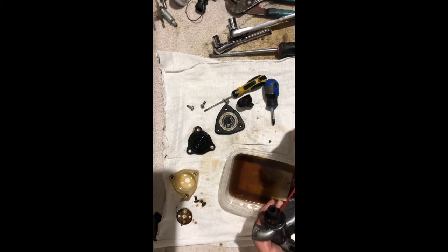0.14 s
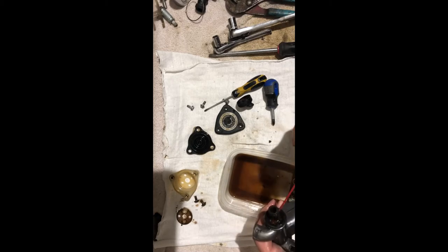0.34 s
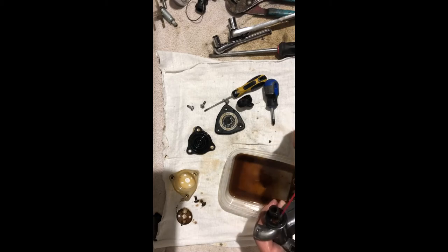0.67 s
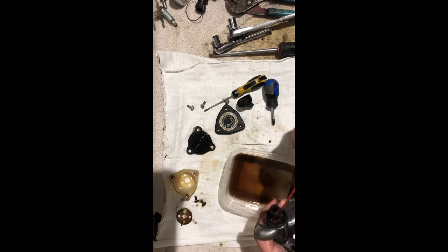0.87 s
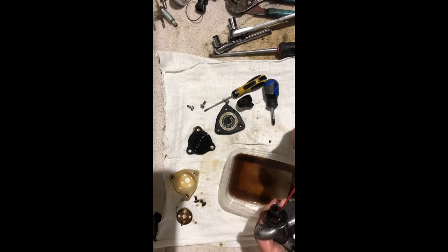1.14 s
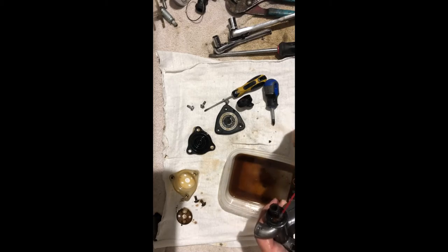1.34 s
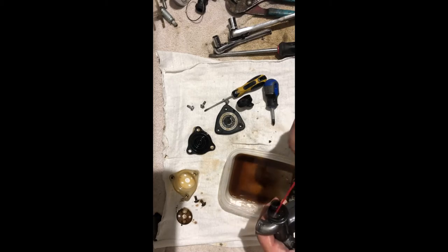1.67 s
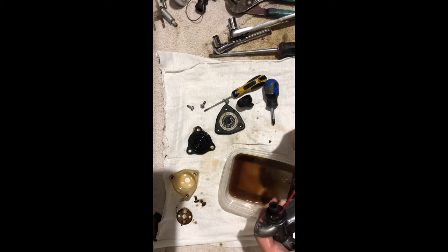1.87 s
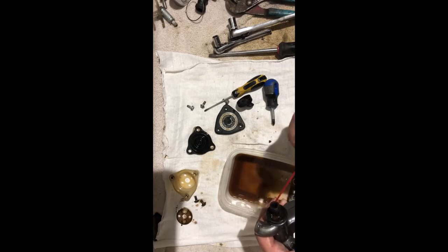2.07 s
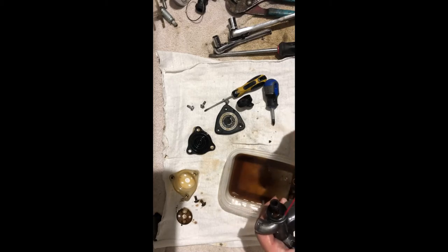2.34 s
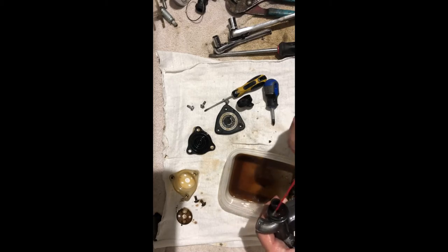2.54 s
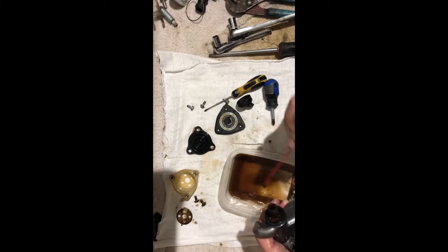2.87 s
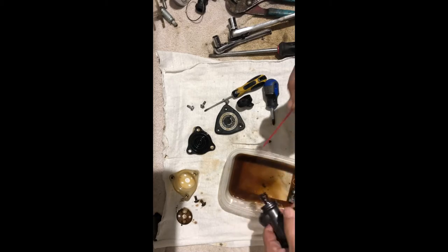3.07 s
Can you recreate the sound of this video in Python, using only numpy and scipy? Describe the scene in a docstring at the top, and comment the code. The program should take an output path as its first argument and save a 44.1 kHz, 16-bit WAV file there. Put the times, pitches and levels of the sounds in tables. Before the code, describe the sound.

An aerosol can sprays into a metal part after a tiny tick, hissing for over two and a half seconds with shifting resonances, then squeaks shut and dribbles; close microphone, quiet humming workshop.

```python
"""A hissing, spitting spray rings a thin straw and a metal bore, over a low workshop hum.
An aerosol can sprays cleaner into the part: turbulent noise through resonances that fade from pose to pose
as the hand moves the aim. The closing valve squeaks in a few harmonics, the straw whistles in gliding
sines and dribbles out. Ticks are short chirps, the room is shaped noise, the walls are sparse echoes."""
import sys
import numpy as np
from scipy import signal
from scipy.fft import rfft, irfft
from scipy.io import wavfile
from scipy.ndimage import uniform_filter1d, map_coordinates

SR = 44100
rng = np.random.default_rng(int(sys.argv[2]) if len(sys.argv) > 2 else 0)


def voltage_ratio(decibels):
    """Convert decibels (scalar or array-like) to amplitude ratios, 20 dB per decade."""
    exponent = np.asarray(decibels, float) / 20
    return 10 ** exponent


def generate_wav(signal):
    """Clip the signal to [-1, 1] and save it as 16-bit WAV at the path in sys.argv[1]."""
    frames = np.transpose(np.atleast_2d(signal))
    scaled = np.clip(frames, -1, 1) * 32767
    pcm = np.round(scaled).astype(np.int16)
    wavfile.write(sys.argv[1], SR, pcm)


N = 141120  # samples, 3.2 s

# Crossovers between lows, body, treble and top treble, and the upper end of the spray's band, in Hz
LOW_HZ, TREBLE_HZ, TOP_HZ, EDGE_HZ = 2800, 9200, 13000, 15770


def evened(x):
    """Scales to rms 1."""
    return x / np.sqrt(np.mean(x ** 2) + 1e-20)


def read(points, hz):
    """Reads a spectrum table on a log frequency axis."""
    point_hz, value = np.transpose(points)
    return np.interp(np.log(hz + 1), np.log(point_hz + 1), value)


def along(table, column=1):
    """Interpolates one column of a time table, sample by sample."""
    rows = np.array(table)
    return np.interp(np.arange(N) / SR, rows[:, 0], rows[:, column])


def wander(seconds):
    """Smooth random drift of rms 1: noise averaged over the given time."""
    return evened(uniform_filter1d(rng.standard_normal(N), max(int(seconds * SR), 2)))


def room_tone():
    """Low workshop rumble of shaped noise, with hum lines made fuzzy by a narrow band of noise each."""
    # Colour of the rumble. Each row: frequency in Hz, relative density in dB per Hz.
    rumble_colour = [(18, -48), (30, -13.5), (66, -4), (156, -5), (188, -9.5), (238, -14), (278, -15),
                     (423, -17.5), (626, -22.5), (714, -21), (1000, -23.5), (1370, -29), (1740, -31.5),
                     (4830, -35.5), (15700, -40)]
    # Wavering low hum. Each row: frequency in Hz, width in Hz between the -6 dB points, rms level in dB.
    hum_lines = [(59.4, 13, -73.5), (83.3, 2.6, -72.5), (142.3, 9.9, -75.5)]
    rumble_db = -67.5
    hz = np.fft.rfftfreq(N, 1 / SR)
    rumble = irfft(rfft(rng.standard_normal(N)) * voltage_ratio(read(rumble_colour, hz)), N)
    out = voltage_ratio(rumble_db) * evened(rumble)
    for centre, spread_hz, db in hum_lines:
        line = 1 / (1 + (2 * (hz - centre) / spread_hz) ** 2)
        out = out + voltage_ratio(db) * evened(irfft(rfft(rng.standard_normal(N)) * line, N))
    return out


def walls(x):
    """Sparse echoes from bench and walls, of random sign and spacing, decaying exponentially."""
    t60_s = .2
    taps = np.zeros(SR // 2)
    at = np.arange(60, SR // 2 - 22, 22)
    at = at + rng.integers(0, 22, len(at))  # one echo somewhere in every 22 samples
    taps[at] = rng.choice([-1., 1.], len(at)) * voltage_ratio(-60 * at / SR / t60_s)
    return signal.fftconvolve(x, taps / np.linalg.norm(taps))[:N]


def ticks():
    """Small ticks of the nozzle: windowed sines, each a few milliseconds long."""
    # Each row: start in seconds, start pitch in Hz, end pitch in Hz, length in seconds, peak level in dB.
    tick_rows = [(0.172, 2800, 14000, .005, -64), (2.982, 13000, 13000, .003, -74)]
    out = np.zeros(N)
    for start, start_hz, end_hz, length, db in tick_rows:
        n = int(length * SR)
        at = round(start * SR)
        cycles = np.cumsum(np.geomspace(start_hz, end_hz, n)) / SR
        out[at:at + n] += voltage_ratio(db) * np.hanning(n) * np.sin(2 * np.pi * cycles)
    return out


def straw_whistles(wobble):
    """The straw whistles as the flow thins: sines that glide just before their peak."""
    # Each row: start, peak and end in seconds, start pitch in Hz, end pitch in Hz, rms level at the peak in dB.
    whistle_rows = [(2.852, 2.875, 2.888, 2970, 3060, -46), (2.84, 2.871, 2.89, 4520, 5040, -49),
                    (2.865, 2.878, 2.885, 15200, 15300, -62), (2.93, 2.95, 3.01, 3000, 3020, -76),
                    (3.145, 3.19, 3.21, 3980, 4020, -83)]
    t, out = np.arange(N) / SR, np.zeros(N)
    for start, peak, end, start_hz, end_hz, db in whistle_rows:
        swell = np.sin(np.pi / 2 * np.interp(t, [start, peak, end], [0, 1, 0])) ** .5
        hz = np.interp(t, [(start + peak) / 2, peak], [start_hz, end_hz])
        out = out + voltage_ratio(db) * swell * np.sin(2 * np.pi * np.cumsum(hz * wobble) / SR)
    return np.sqrt(2) * out


def valve_squeak(wobble):
    """The closing valve squeaks: three harmonics on a short pitch arch, brightening as it falls."""
    # Each row: time in seconds, pitch in Hz, rms level of the fundamental in dB,
    # brightness in dB per step up the harmonics.
    arch = [(2.856, 1750, -74, -4), (2.862, 1800, -65, -4), (2.869, 1990, -58, -2), (2.884, 2000, -58, 1),
            (2.892, 1830, -62, 3), (2.898, 1650, -67, 7), (2.903, 1420, -77, 8), (2.907, 1380, -90, 8)]
    t = np.arange(N) / SR
    turns = np.cumsum(along(arch) * wobble) / SR
    brightness_db = along(arch, column=3)
    tone = np.zeros(N)
    for order in (1, 2, 3):
        harmonic = np.sin(2 * np.pi * (order * turns + rng.random()))
        tone = tone + voltage_ratio((order - 1) * brightness_db) * harmonic
    sounding = (t > arch[0][0]) * (t < arch[-1][0])
    return np.sqrt(2) * tone * voltage_ratio(along(arch, column=2)) * sounding


def turbulence():
    """Fluttering gas noise with short spits of liquid: random noise bursts that die off exponentially."""
    spits_per_s, spit_spread_db, spit_db, spit_s = 900, 4, -10.5, 0.00028  # spit_db is relative to the gas
    flutter_db, flutter_s, surge_db, surge_s = 0.96, 0.0026, 0.25, 0.029  # rms depths, averaging times
    struck = rng.random(N) < spits_per_s / SR
    size = struck * voltage_ratio(spit_spread_db * np.minimum(rng.exponential(1, N), 4))
    burst = signal.lfilter([1], [1, -np.exp(-1 / (spit_s * SR))], size)
    spits = evened(burst * rng.standard_normal(N))
    gas = evened(rng.standard_normal(N) * voltage_ratio(flutter_db * wander(flutter_s)))
    return (gas + voltage_ratio(spit_db) * spits) * voltage_ratio(surge_db * wander(surge_s))


def patchy(x):
    """Lays slowly changing ridges and gliding hollows over the spectrum."""
    # Hollows that open, and some glide, as the part turns. Each row: start and end in seconds,
    # start and end frequency in Hz, half width in Hz, depth in dB.
    hollow_rows = [(1.98, 2.25, 13500, 11400, 830, -3), (2.1, 2.5, 13700, 10200, 610, -2),
                   (1.5, 1.75, 12500, 9800, 670, -2), (1.46, 1.88, 6300, 6050, 350, -3),
                   (2.35, 2.7, 5900, 6100, 350, -4), (1.43, 1.82, 8400, 8200, 580, -4),
                   (2.36, 2.68, 8000, 7900, 500, -2)]
    ridge_db, ridge_hz, ridge_s = 2.0, 450, .06  # rms in the treble; scales of the smoothing
    hz, t, z = signal.stft(x, SR, nperseg=512, noverlap=384)
    field = rng.standard_normal(z.shape)
    for _ in range(2):
        field = uniform_filter1d(field, int(ridge_hz / hz[1] / 2) + 1, 0)
        field = uniform_filter1d(field, int(ridge_s * SR / 128), 1)
    deeper_upwards = np.clip(hz / TREBLE_HZ, 0, 1)[:, None] ** 2
    db = ridge_db * deeper_upwards * evened(field)
    for start, end, start_hz, end_hz, half_hz, depth_db in hollow_rows:
        progress = np.clip((t - start) / (end - start), 0, 1)
        centre = start_hz + progress * (end_hz - start_hz)
        dip = np.exp(-((hz[:, None] - centre) / half_hz) ** 2)
        db = db + depth_db * np.sin(np.pi * progress) ** .5 * dip
    return signal.istft(z * voltage_ratio(db), SR, nperseg=512, noverlap=384)[1][:N]


def pose_powers(hz):
    """Power spectrum of each pose: broad hiss plus resonant peaks of straw and bore, dented by gaps."""
    # Resonances of straw and bore, one table a pose. Each row: pitch in Hz,
    # least width in Hz between the -6 dB points, relative peak level in dB.
    ring_first = [(870, 110, -18), (1745, 42, -2), (2570, 130, -18), (3240, 78, -2), (4280, 280, 3),
                  (5260, 160, 3), (5540, 110, -2), (6400, 39, -3), (6770, 96, -1), (7200, 110, -4),
                  (8020, 82, -7), (9000, 46, -16), (9100, 57, -30), (10100, 140, -13), (10800, 92, -18),
                  (11700, 270, -25), (13700, 110, -19), (14800, 76, -22), (15300, 530, -20)]
    ring_tilted = [(1750, 50, -7), (2530, 110, -10), (3460, 570, -12.5), (4300, 280, -0.5), (5150, 280, -2),
                   (5400, 89, -4), (6670, 130, 0.5), (7210, 50, -2), (8040, 130, -9), (8450, 48, -16),
                   (8770, 220, -6), (9800, 310, -13), (11200, 210, -20), (11500, 310, -18), (12900, 82, -9),
                   (12200, 51, -31), (13200, 39, -33), (13700, 470, -23), (14800, 42, -10)]
    ring_bore = [(867, 320, -25.5), (1766, 40, -2.5), (3260, 210, -7.5), (4275, 200, 2.5), (5150, 210, 5),
                 (5500, 77, 3), (6160, 27, -23), (6400, 59, -15), (6540, 53, -10), (7140, 270, -0.5),
                 (8900, 170, -9), (11300, 150, -22), (12700, 130, -13), (13000, 64, -16), (13400, 92, -12),
                 (13900, 88, -7), (14400, 54, -19), (14700, 110, -7), (14800, 110, -11)]
    ring_rim = [(872, 110, -28), (1764, 54, -6.5), (2550, 220, -6), (3400, 460, -7.5), (4480, 180, 3),
                (5430, 79, -8), (5610, 98, 5), (6740, 120, 0), (7640, 100, -18), (8380, 37, -8),
                (8890, 97, -4), (9410, 44, -23), (9930, 120, -10), (10600, 37, -38), (11700, 160, -30),
                (12700, 56, -17), (13300, 250, -14), (14600, 180, -14), (15500, 360, -7)]
    ring_drain = [(3000, 150, -8), (4100, 150, -9), (4670, 200, -5), (5100, 220, -4), (5470, 200, -7),
                  (8800, 400, -20)]
    # Broad hiss between them, one table a pose. Each row: frequency in Hz, density in dB before hiss_db.
    hiss_first = [(120, -49), (200, -14.5), (352, -15), (667, -23), (862, -10), (1310, -14.5), (2530, -7),
                  (2820, -13), (3150, 0), (3850, -5.5), (4220, -7), (6540, 1), (9420, -14.5), (15700, -21)]
    hiss_tilted = [(120, -49), (200, -23.5), (316, -15.5), (667, -26.5), (862, -12.5), (1260, -18),
                   (2480, -9.5), (2770, -15), (3270, -4), (3920, -10.5), (4220, -9), (6540, -1.5),
                   (9420, -11.5), (15700, -12)]
    hiss_bore = [(120, -42), (200, -16), (359, -12.5), (680, -22.5), (816, -7.5), (1310, -14.5),
                 (1760, -9.5), (2620, -8.5), (3090, 0), (4300, 1.5), (5970, -6.5), (7160, -2),
                 (8440, -14.5), (15700, -10.5)]
    hiss_rim = [(120, -47), (200, -15.5), (620, -21.5), (846, -11.5), (1260, -16.5), (2440, -8.5),
                (2820, -24), (3210, 1), (3990, -7.5), (4450, -4), (5650, -1), (6900, -1), (10700, -16),
                (15700, -16)]
    hiss_drain = [(290, -48), (500, -18), (561, -17), (639, -25), (2410, -15), (2780, -10), (4680, -4),
                  (7520, -14), (8950, -19), (10500, -34), (15700, -18)]
    # Gaps between the resonances, the same in every pose. Each row: frequency in Hz, half width in Hz,
    # depth in dB.
    gap_rows = [(1274, 54, -3.5), (1634, 50, -3.5), (2775, 110, -3), (3940, 175, -2.5), (4720, 113, -3),
                (9530, 210, -2)]
    hiss_db = -1.5  # offset of every hiss table
    narrowest = .033  # least width of a resonance, as a share of its pitch
    poses = [(ring_first, hiss_first), (ring_tilted, hiss_tilted), (ring_bore, hiss_bore),
             (ring_rim, hiss_rim), (ring_drain, hiss_drain)]
    gaps_db = sum(db * np.exp(-((hz - f) / half_hz) ** 2) for f, half_hz, db in gap_rows)
    powers = []
    for rings, hiss in poses:
        power = voltage_ratio(read(hiss, hz) + hiss_db) ** 2
        for f, ring_hz, db in rings:
            off_centre = 2 * (hz - f) / max(ring_hz, narrowest * f)
            power = power + voltage_ratio(db) ** 2 / (1 + off_centre ** 2) ** 2
        powers.append(power * voltage_ratio(gaps_db) ** 2)
    return powers


def causal(power):
    """Minimum-phase response for a power spectrum: its phase is the Hilbert transform of the log gain."""
    half = np.log(power + 1e-10) / 2
    full = np.concatenate([half, half[-2:0:-1]])
    return np.fft.ifft(np.exp(full - 1j * signal.hilbert(full).imag)).real[:2048]


def bands(x):
    """Splits into lows, body, treble and top treble, each of rms 1."""
    z, hz = rfft(x), np.fft.rfftfreq(len(x), 1 / SR)
    below_low, below_treble, below_top = [1 / (1 + (hz / edge) ** 16) for edge in (LOW_HZ, TREBLE_HZ, TOP_HZ)]
    top = (1 - below_top) * (hz < EDGE_HZ)
    gains = (below_low, below_treble - below_low, below_top - below_treble, top)
    return np.array([evened(irfft(z * gain, len(x))) for gain in gains])


def jet():
    """Turbulence through the wandering resonances of each pose, faded by the aim and levelled by the flow."""
    # Path of the aim. Each row: time in seconds, pose (0 first, 1 tilted, 2 deep in the bore, 3 at the rim,
    # 4 valve shut and straw draining; anything higher counts as 4).
    aim_path = [(0, 2), (0.81, 0.0), (0.87, 0.92), (1.37, 1.05), (1.5, 1.55), (1.83, 2.2), (1.95, 2.5),
                (2.33, 3), (2.42, 2), (2.66, 2.05), (2.74, 2.5), (2.84, 3.0), (2.875, 6), (3.2, 4.0)]
    # Flow as the valve opens, sprays, shuts and the straw drains. Each row: time in seconds,
    # rms level of the body in dB, then lows, treble and top treble in dB relative to the body.
    opening = [(0.177, -62, -12, -27, -26), (0.195, -49, -9.5, -18, -9.5), (0.233, -44, -12.5, -36, -14),
               (0.3, -42.5, -11.5, -12.5, -17)]
    spraying = [(0.33, -40, -16.5, -24, -13), (0.35, -41.5, -11, -17.5, -15),
                (0.67, -43.5, -12.5, -18, -15), (0.84, -43.5, -13.5, -15, -17),
                (0.89, -41, -14.5, -12.5, -14), (1.01, -41.5, -14, -17.5, -17.5),
                (1.2, -41, -13.5, -13, -11), (1.35, -41.5, -14.5, -16.5, -19),
                (1.39, -42, -13.5, -16.5, -12), (1.5, -43, -12.5, -18, -14.5),
                (1.76, -45.5, -10.5, -12.5, -8), (1.84, -44, -12, -15.5, -14), (1.94, -42, -13, -12, -11),
                (2.04, -42.5, -14, -12.5, -18), (2.16, -43.5, -11, -21, -8), (2.28, -41.5, -13, -15, -11),
                (2.45, -46, -9.5, -13.5, -12), (2.74, -42, -12.5, -13, -12), (2.8, -42, -12, -22, -16)]
    shutting = [(2.83, -42, -12, -22, -11), (2.845, -44, -13, -22, -10), (2.858, -47.5, -16, -21, -8),
                (2.876, -49.5, -18, -20, -6), (2.89, -55, -15, -16, -5), (2.897, -52, -19, -18, -8)]
    # Three lists of such rows, one after another
    closing = [
        [(2.905, -48, -18, -23, -15), (2.929, -56.5, -14, -20, -15), (2.951, -69.5, -8, -19, -23),
         (2.965, -68, -18, -21, -36)],
        [(2.975, -71, -6, -28, -33), (2.983, -73, -13, -10, -10), (2.997, -69, -12, -21, -22),
         (3.015, -75, -4, -15, -14), (3.047, -72, -13, -8, -7), (3.07, -78, -6, -13, -6)],
        [(3.085, -77, -3, -8, -6), (3.105, -87, 1, -10, -6), (3.151, -84, 0, -12, -12),
         (3.167, -80, -3, -15, -24), (3.189, -79, 4, -11, -16), (3.2, -78, -12, -12, -25)],
    ]
    drift_share, drift_s = .005, .12  # the resonances wander by this rms share as the hand shakes
    drive = patchy(turbulence())
    aim = np.clip(along(aim_path), 0, 4)
    drift = uniform_filter1d(wander(drift_s), int(drift_s * SR))
    # Reading the sound at an uneven pace shifts its resonances up and down
    warped = np.arange(N) + drift_share * np.cumsum(evened(drift - drift.mean()))
    out = 0
    for pose, power in enumerate(pose_powers(np.fft.rfftfreq(8192, 1 / SR))):
        rung = signal.oaconvolve(drive, causal(power))[:N]
        rung = map_coordinates(rung, [warped], order=5, mode="mirror")
        share = np.clip(1 - abs(aim - pose), 0, 1)
        out = out + share * bands(rung)
    lows, body, treble, top = out
    flow = opening + spraying + shutting + sum(closing, [])
    low_gain, treble_gain, top_gain = [voltage_ratio(along(flow, column=k)) for k in (2, 3, 4)]
    opened = np.arange(N) / SR > flow[0][0]
    coloured = low_gain * lows + body + treble_gain * treble + top_gain * top
    return opened * voltage_ratio(along(flow)) * coloured


def scene():
    """Spray, its echoes and the room, heard by one microphone and sent to both channels."""
    walls_db = -11
    wobble = 1 + .008 * wander(.003)  # pitch wobble shared by squeak and whistles, a share of the pitch
    spray = jet() + valve_squeak(wobble) + straw_whistles(wobble) + ticks()
    mono = spray + voltage_ratio(walls_db) * walls(spray) + room_tone()
    return np.array([mono, mono])


def roll_off(x):
    """The treble ends steeply here."""
    return signal.sosfilt(signal.butter(12, 15900, fs=SR, output="sos"), x)


def record(dry):
    """Limits the band with a steep linear-phase low-pass and finishes the mix."""
    lowpass = signal.firwin(1535, EDGE_HZ, window=("kaiser", 9), fs=SR)
    limited = signal.oaconvolve(dry, lowpass[None], "same")
    return roll_off(limited)


dry = scene()
out = record(dry)
generate_wav(out)
```